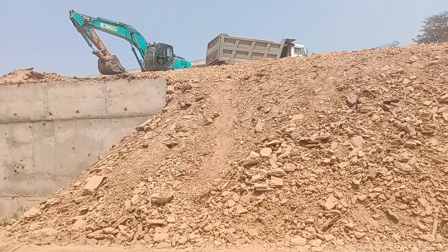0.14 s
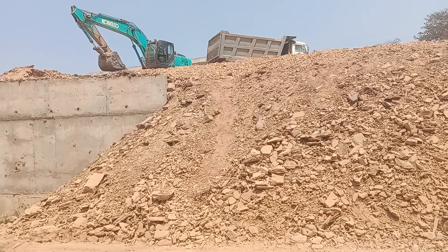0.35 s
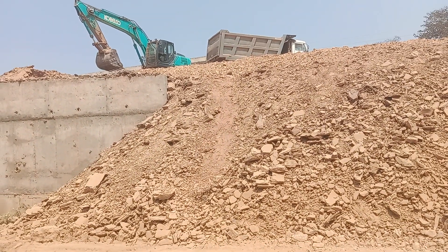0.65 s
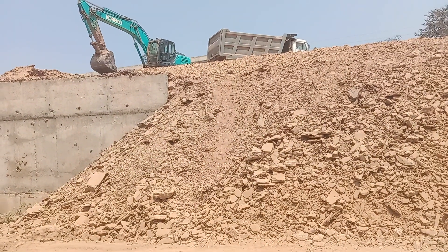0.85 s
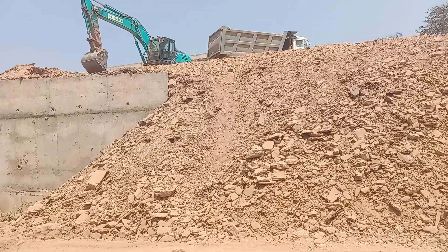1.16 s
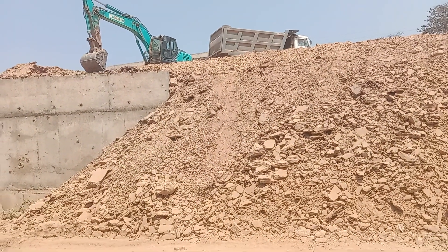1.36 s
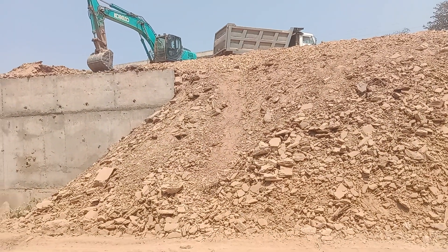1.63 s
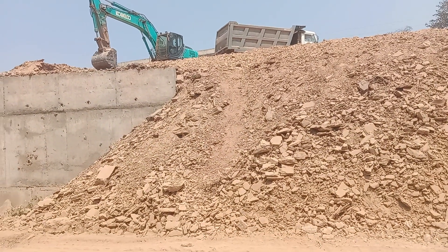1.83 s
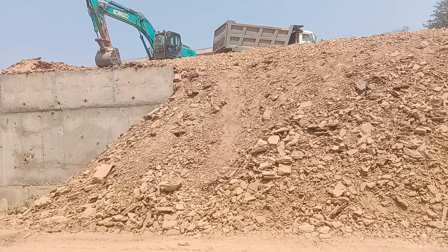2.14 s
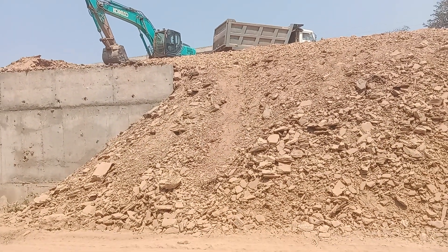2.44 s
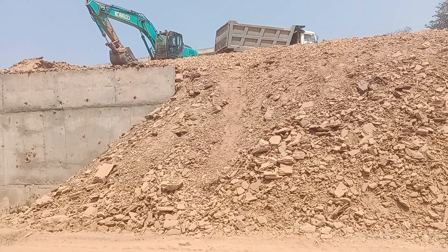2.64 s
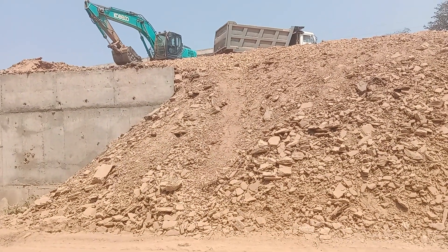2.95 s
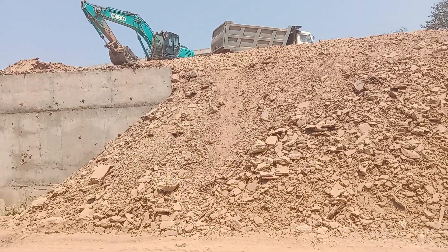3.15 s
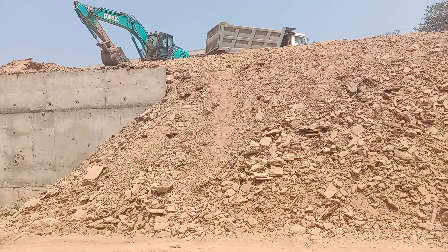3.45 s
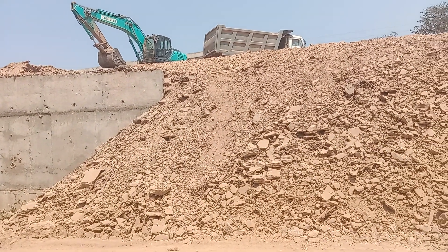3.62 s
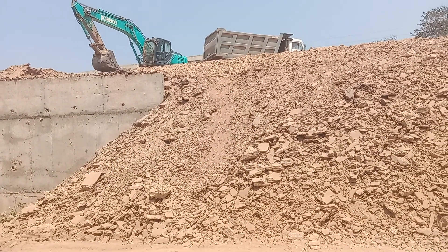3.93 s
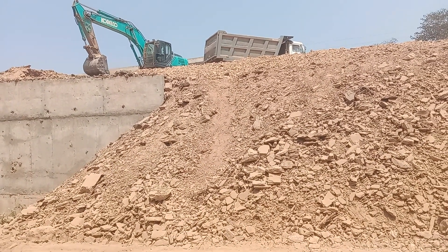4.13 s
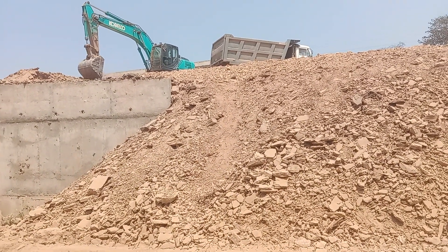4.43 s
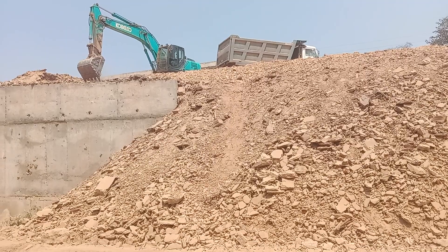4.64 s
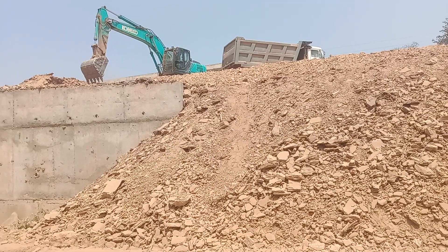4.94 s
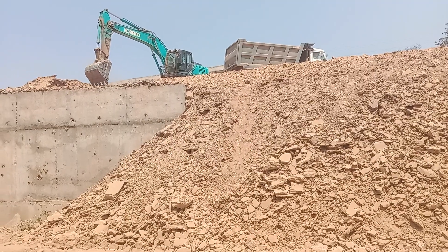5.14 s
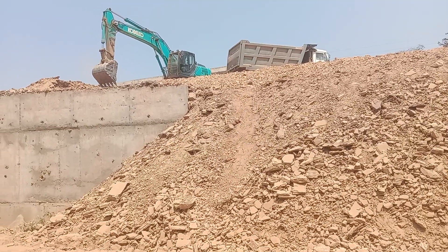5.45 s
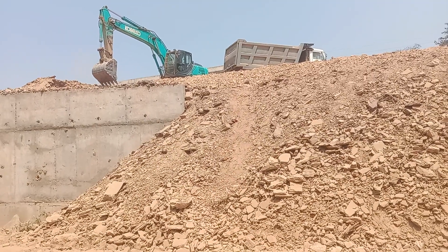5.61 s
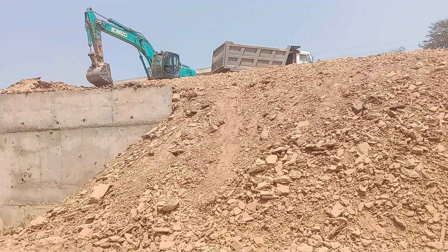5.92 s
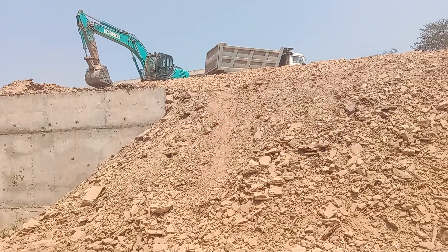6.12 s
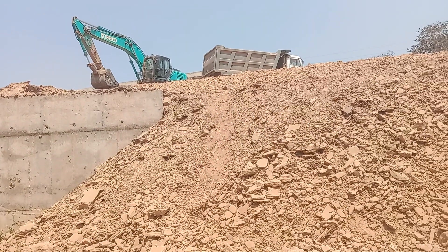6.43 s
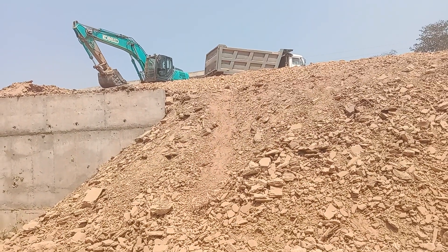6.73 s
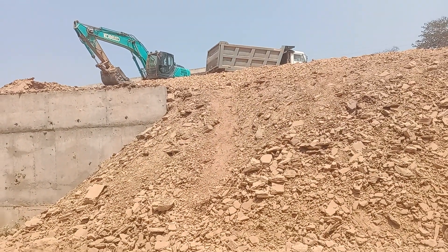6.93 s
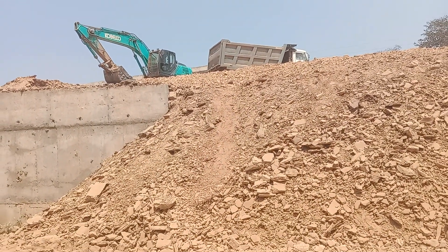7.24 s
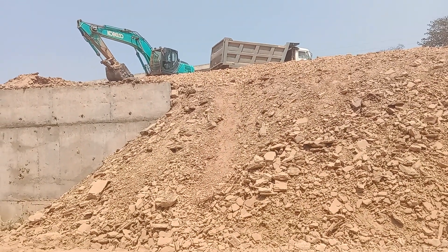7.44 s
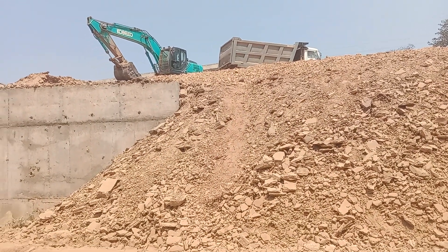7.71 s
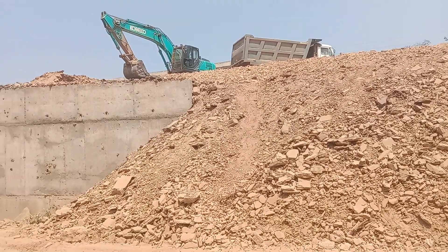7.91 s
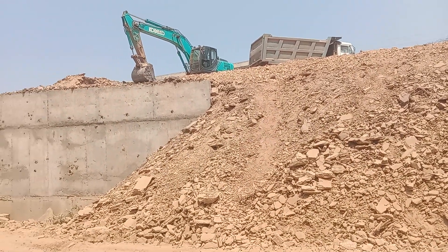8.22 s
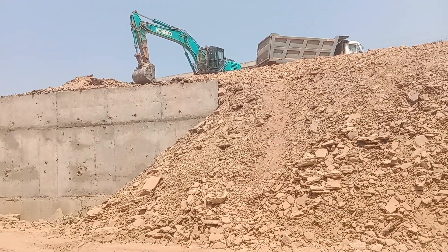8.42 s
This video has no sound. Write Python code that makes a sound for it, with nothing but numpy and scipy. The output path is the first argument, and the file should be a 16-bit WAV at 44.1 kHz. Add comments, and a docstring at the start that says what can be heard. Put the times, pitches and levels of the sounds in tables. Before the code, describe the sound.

Rough stone-on-steel scraping with clanging knocks opens loudly, heard from some distance outdoors through a small phone microphone with little deep bass. Irregular bursts follow, with short dull metallic rings and a faint slap of echo. A quiet pause falls before six seconds, then a few crunches and clanks. Dry, close taps from the hand on the phone stand out late; faint engine noise, thin hiss and a weak rising squeak remain.

```python
"""Stones grind and knock against steel at once: an excavator high on a bank of spoil drags and shakes
its bucket through loose rock. Random stone contacts excite resonant plates, and single plates sing out.
Filtered noise makes the faint engine, its pump whine and fan; a rough whistle and hiss lie on top.
Late on, damped swings with noise snaps give ticks from the hand on the phone, close to the microphone,
and a short rising tone squeaks."""
import sys
import numpy as np
from scipy import signal
from scipy.io import wavfile

SR = 44100
rng = np.random.default_rng(int(sys.argv[2]) if len(sys.argv) > 2 else 0)


def digitize_waveform(pressure):
    """Quantize a signal to 16-bit integers and store it at the path in sys.argv[1].

    Rows of a 2-D input are taken as channels; values are limited to [-1, 1].
    """
    field = np.atleast_2d(pressure).T
    bounded = np.clip(field, -1, 1)
    quanta = np.round(bounded * 32767).astype(np.int16)
    wavfile.write(sys.argv[1], SR, quanta)


N = 377935

# Strokes of the bucket through stone; the last three columns are relative to the grinding level:
# start_s, length_s, start_level_db, end_level_db, heavy_db, sharp_db, grit_db
STROKES = [(-0.05, 0.29, -14.5, -20, 2.5, -1, -0.5), (0.186, 0.7, -19, -25.5, 2.5, 2, -5),
           (0.902, 0.21, -21.5, -21, -21, -13, -33), (1.145, 0.12, -34, -13, -24, 0, -14),
           (1.625, 0.4, -12, -21.5, -2, -1.5, 0), (2.196, 0.082, -37, -38, -25, -10.5, -6),
           (2.409, 0.062, -35, -39.5, 1.5, 8, 2), (2.776, 0.18, -36.5, -28.5, -18, 10, 13),
           (2.821, 0.38, -14.5, -25, -1, -5.5, -18), (3.192, 0.07, -6.5, -9.5, -0.5, -0.5, 1.5),
           (3.333, 0.18, -27, -21, 2.5, 1.5, -2.5), (3.547, 0.13, -45, -24, -12, 0, -9),
           (3.867, 0.16, -4, -20, -1.5, -2.5, -1.5), (4.24, 0.24, -24.5, -16.5, -8, -7.5, -11),
           (4.615, 0.36, -59, -61, -10, 19, 13), (4.864, 0.085, -70, -21.5, -32, -7, -25),
           (4.988, 0.018, -7, -12, -3.5, 2, -1), (5.122, 0.23, -15.5, -18.5, -7.5, -2.5, -10),
           (5.305, 0.18, -20.5, -23.5, -10, -5.5, -7.5), (5.607, 0.81, -54.5, -57.5, 2.5, 2.5, 3.5),
           (6.505, 0.16, -14, -53, -8.5, -2, -2.5), (6.813, 0.03, -31.5, -29, -8, 1.5, -15.5),
           (6.855, 0.29, -7.5, -32, -4, -2.5, -2), (7.014, 0.023, -23.5, -10, -6.5, 0.5, -22),
           (7.502, 0.1, -29, -34.5, -9, 3, -4), (7.671, 0.017, -47, -19.5, -37, -7, -27),
           (7.868, 0.1, -10, -19, -2, -2, -1), (8.09, 0.46, -57.5, -48, -0.5, -5.5, -5.5)]
# Knocks of rock and linkage on steel; heavy, sharp and grit are relative to the level:
# start_s, level_db, heavy_db, sharp_db, grit_db, rattle_t60_s (kept within 0.02 to 0.6 s when played)
KNOCKS = [(0.045, -9.5, -5, -37, -16, 0.19), (0.077, -8, 7.5, 2, -1, 0.18),
          (0.202, -5.5, -29.5, -3, -2.5, 0.51), (0.358, -7.5, 0, -3.5, -37.5, 0.52),
          (0.48, -8, -2.5, -3.5, -0.5, 0.91), (0.578, -11, -3.5, -8, -3, 0.33),
          (0.65, -11, -3, -2.5, -15, 0.35), (0.677, -8, -3, 0, -1, 0.82),
          (0.698, -3.5, -14, -1.5, 8.5, 0.011), (0.815, -13.5, -3.5, -8, -35, 0.64),
          (1.003, -17, -2, -7.5, -16, 0.48), (1.165, -15, -1.5, -4, -15, 0.51),
          (1.275, -22.5, -33, -6, -2, 0.37), (1.315, -26.5, -16.5, -4, 3.5, 0.14),
          (1.609, -28.5, -16, 0, -9, 0.29), (1.634, -22.5, -28, -3, 12, 0.29),
          (1.804, -10, 0.5, -13.5, -14.5, 0.35), (1.844, -5.5, -11, 0.5, -3.5, 0.36),
          (1.964, -7, -37, -3, -2, 0.4), (2.233, -42, -16, -22, -27, 0.16),
          (2.415, -22.5, -32, 9, -13, 0.11), (2.828, -8.5, -15, -0.5, 5.5, 0.39),
          (3.004, -13.5, 3, 0.5, -16, 0.31), (3.161, -3.5, -16, -17.5, -25, 0.046),
          (3.178, -4, -2, 2, 5, 0.21), (3.33, 1, -6, -5.5, -2, 0.35), (3.505, -18, -2, -8, -17, 0.24),
          (3.632, -21.5, -0.5, -29, -22, 0.23), (3.664, -17, -4, 0.5, -1, 0.15),
          (3.865, -10.5, -3, -15, 13, 0.064), (4, -22, 8, -8, -1, 0.18), (4.237, -29.5, 5, -38, -3, 0.64),
          (4.385, -25.5, -9, 4, -4, 0.33), (4.451, -13, -5.5, 2, 2.5, 0.34),
          (4.651, -36.5, -24, 10.5, 4.5, 0.14), (4.753, -36, -37, 5.5, 2, 0.21),
          (4.893, -27.5, -25.5, -4, -4.5, 0.36), (4.971, -14, -9, 2.5, -1, 0.46),
          (5.084, -22.5, -3, 5.5, 4, 0.41), (5.169, -15.5, 1.5, 6, 5.5, 0.35),
          (5.195, -9, -1.5, 2.5, 1.5, 0.22), (5.298, -7.5, -7, -4, -17.5, 0.074),
          (5.333, -7.5, -43, -5.5, -3, 0.057), (5.463, -18, -10, -36, -27, 0.25),
          (5.589, -52, -18, 20.5, 22, 0.35), (6.493, -29, -26, -0.5, -2, 0.24),
          (6.584, -30.5, -41, 9, -36, 0.11), (6.85, -14.5, -20, 9, 4.5, 0.065),
          (6.952, -27, 10.5, 2.5, -5.5, 0.21), (7.035, -8, 1.5, -4, -9, 0.079),
          (7.479, -18.5, -18, -4.5, -17, 0.23), (7.664, -20, -35, -12, -7, 0.057),
          (7.71, -23, -2.5, 1, -24, 0.17), (7.858, -16.5, -22.5, 0, -10.5, 0.22),
          (7.953, -11, -4.5, -1, -2, 0.28)]
# Plates of the bucket: pitch_hz, level_db
PLATES = [(104, -16), (139, -14), (269, -14.5), (387, -7), (559, -27), (751, -4), (861, -10), (1195, -15),
          (1270, -20), (1496, -18), (1658, -27), (1841, -16.5), (2444, -28), (2594, -22.5), (2982, -22.5),
          (3208, -26), (3380, -23.5), (3725, -31), (4059, -31), (4705, -28.5), (5038, -35), (5329, -36),
          (5738, -38.5), (6180, -35.5)]
# Relative spectrum of the crowd of lesser modes in bucket, teeth and arm: pitch_hz, level_db_per_hz
LESSER_MODES = [(70, -20), (130, -24.5), (190, -10.5), (280, 2), (430, -3.5), (530, -36.5), (700, -18),
                (800, -3), (1000, 0.5), (1130, -9), (1500, -5.5), (2000, -26), (2150, -30), (2450, -11),
                (2700, -31), (2950, -14), (3450, -20), (3650, -64), (4200, -29.5), (4600, -30),
                (5500, -29.5), (6200, -39), (7000, -59.5)]
# Engine levels over time: time_s, rumble_db, clatter_db
ENGINE_LEVELS = [(0.0, -37, -37.5), (0.5, -46, -28.5), (1.41, -56, -76.5), (1.81, -65, -32.5),
                 (2.46, -56, -59.5), (3.01, -63, -44), (3.41, -49.5, -17.5), (3.67, -52.5, -48),
                 (5.2, -54.5, -49.5), (5.7, -60, -58.5), (6.4, -63, -61), (7.09, -53, -48),
                 (7.37, -58, -54.5), (7.83, -51, -43.5), (8.16, -58, -51), (8.57, -58.5, -61.5)]
# Relative spectrum of the engine clatter: pitch_hz, level_db_per_hz
CLATTER_SPECTRUM = [(150, -15), (331, 16), (520, -17.5), (766, 2), (900, 3), (960, 5), (1040, -12.5),
                    (1450, 3.5), (1690, -12), (1890, 2), (2190, -23), (3100, -8.5), (4900, -40)]
# Swells of a thin high whistle that glides from one to the next:
# middle_s, pitch_hz, peak_db, fade_db_per_s (on either side of the middle)
SWELLS = [(3.781, 12000, -73, 40), (4.299, 12100, -76, 24.5), (5.461, 12000, -65, 116),
          (6.0, 12550, -81.5, 14)]
# Short single-plate tones that sag while held, then die quickly: start_s, pitch_hz, level_db, held_s
RINGS = [(0.085, 766, -16.5, 0.045), (0.25, 760, -14.5, 0.026), (0.357, 259, -7.5, 0.012),
         (0.815, 263, -18, 0.018), (1.161, 264.6, -13.5, 0.039), (2.1, 755, -28.5, 0.067),
         (2.225, 949, -34, 0.077), (2.233, 1854, -48, 0.052), (2.45, 739, -33.5, 0.038),
         (3.185, 735, -18.5, 0.089), (3.334, 390, -37, 0.046), (3.4, 740, -20, 0.066),
         (3.4, 840, -20.5, 0.034), (3.503, 397, -23.5, 0.068), (3.624, 278, -22, 0.048),
         (4.11, 1064, -44, 0.091), (4.248, 273.2, -23, 0.079), (4.65, 1800, -42, 0.032),
         (4.665, 1496, -45, 0.16), (4.76, 900, -44, 0.065), (4.865, 1995, -41.5, 0.03),
         (4.452, 274, -11, 0.025), (4.902, 274, -30, 0.049), (5.298, 260.6, -8.5, 0.018),
         (5.333, 1420, -10.5, 0.011), (5.468, 732, -25.5, 0.05), (5.475, 1840, -48.5, 0.31),
         (5.614, 1910, -40, 0.024), (5.91, 1980, -50, 0.03), (5.93, 1820, -59, 0.041),
         (6.52, 796, -27, 0.032), (6.582, 2990, -50, 0.22), (6.87, 782, -20, 0.041), (7.5, 955, -28.5, 0.1),
         (8.37, 1407, -54.5, 0.087), (8.41, 747, -43, 0.06), (8.5, 906, -54, 0.06)]
# Ticks by the microphone:
# start_s, level_db, body_hz, damping_per_cycle (nepers), snap_db, snap_length_s
TICKS = [(7.303, -18.5, 1810, 0.61, -36.5, 0.0029), (7.5871, 7.5, 1190, 3.1, -38, 0.001),
         (7.5879, -5, 326, 1.6, -17.5, 0.0033), (7.6217, 17.5, 850, 3.5, -26, 0.0011)]
# Borders between the heavy, middle, sharp and gritty ranges: border_hz
RANGE_BORDERS_HZ = [560, 2150, 3650]

BITE_DB_PER_S = 1501   # how fast a stroke sets in
FALL_DB_PER_S, FALL_QUICKENS_S = 106.5, 0.047   # how a stroke dies away: the rate doubles after this time
CRUNCH_DB, CRUNCH_RATE_HZ = 2.8, 35   # the grinding level wanders in lumps
LONGEST_RING_S, MOST_CYCLES = 0.1, 200   # limits on plate t60: high modes die sooner
WANDER_DB_PER_KHZ = 0.7   # the level of high modes wanders more
GRIT_DB = -36   # rasp of the stones themselves, heard beside the steel
FIRING_HZ = 73
WHINE_HZ, WHINE_FADES_DB_PER_S = 5038, 1.2   # hydraulic pump
FAN_DB = -74.5   # hiss of the cooling fan
AIR_DB = -92
RING_RISE_S, RING_SAG_DB_PER_S = 0.0085, 55
RING_END_DB_PER_S = 703.5   # extra fall once no longer held
RING_WAVER_DB, RING_WAVER_PITCH = 4.5, 0.014   # unsteady level; share of the pitch
SQUEAK_S, SQUEAK_LENGTH_S, SQUEAK_DB = 8.25, 0.095, -51.5
SQUEAK_FROM_HZ, SQUEAK_TO_HZ = 545, 625
CUTOFF_HZ = 16100


def from_db(db):
    """Decibels to amplitude."""
    return 10 ** (np.asarray(db) / 20)


def rms_one(x):
    """Bring a signal to an rms of 1."""
    return x / np.sqrt(np.mean(x ** 2) + 1e-20)


def in_time(rows):
    """Draw each column of a table as a straight-line curve over time, the first column."""
    s, *columns = np.transpose(rows)
    return [np.interp(np.arange(N) / SR, s, c) for c in columns]


def band(x, low_hz, high_hz):
    """Keep the band between two pitches."""
    return signal.sosfilt(signal.butter(2, [low_hz, high_hz], "band", fs=SR, output="sos"), x)


def lowpass(x, order, hz):
    """Cut the treble above a pitch."""
    return signal.sosfilt(signal.butter(order, hz, fs=SR, output="sos"), x)


def ring(x, hz, t60):
    """One mode with steep skirts: a narrow resonance, scaled for its decay, and a broad one in series."""
    turn = 2 * np.pi * hz / SR
    r = from_db(-60 / (t60 * SR))
    wide = np.exp(-np.pi * (50 + 0.055 * hz) / SR)
    narrow_gain = np.sqrt(1 - r) / 2
    wide_gain = (1 - wide ** 2) / 2
    narrow_stage = [narrow_gain, 0, -narrow_gain, 1, -2 * r * np.cos(turn), r * r]
    wide_stage = [wide_gain, 0, -wide_gain, 1, -2 * wide * np.cos(turn), wide ** 2]
    return signal.sosfilt([narrow_stage, wide_stage], x)


def patches(spread_db, rate_hz):
    """A randomly wandering gain, rms 1: noise at every 40th sample through a double one-pole low-pass."""
    r = np.exp(-80 * np.pi * rate_hz / SR)
    noise = rng.standard_normal(N // 40 + 2002)
    slow = signal.lfilter([1], [1, -2 * r, r * r], noise)[2000:]   # skip the filter's start
    gain = from_db(spread_db * rms_one(slow))
    return np.interp(np.arange(N) / 40, np.arange(len(slow)), rms_one(gain))


def crowd(spectrum, cycles, longest, count):
    """Many modes (pitch_hz, level_db, t60_s), unevenly spaced, closer in the bass, levelled by a spectrum."""
    hz, db = np.transpose(spectrum)
    places = (np.arange(count) + rng.uniform(0.012, 1.0, count)) / count
    pitch = hz[0] + (hz[-1] - hz[0]) * places ** 1.5
    level = np.interp(np.log(pitch), np.log(hz), db)
    level += 5 * np.log10(places)   # wider gaps, more power each
    level -= 10 * np.log10(np.sum(from_db(level) ** 2))   # total power 1
    return np.transpose([pitch, level, np.minimum(cycles / pitch, longest)])


def grains(per_s, spread_db):
    """Random stone contacts of uneven size and either sign; rms 1."""
    sizes = from_db(spread_db * np.minimum(rng.exponential(1, N), 5)) * rng.choice([-1, 1], N)
    return rms_one(sizes * (rng.random(N) < per_s / SR))


def four_ranges(level_db, heavy_db, sharp_db, grit_db):
    """Power in the heavy, middle, sharp and gritty range."""
    return from_db(level_db + np.array([[heavy_db], [0], [sharp_db], [grit_db]])) ** 2


def contact():
    """Force on the steel in four ranges: strokes through the stone plus knocks that die away."""
    power, now = np.zeros((4, N)), np.arange(N) / SR
    for s, length, start_db, end_db, *colour_db in STROKES:
        span = slice(max(round((s - 0.1) * SR), 0), round((s + length + 0.5) * SR))
        t = now[span] - s
        after = np.maximum(t - length, 0)
        level_db = np.interp(t, [0, length], [start_db, end_db])
        level_db += BITE_DB_PER_S * np.minimum(t, 0)
        level_db -= FALL_DB_PER_S * after * (1 + after / (2 * FALL_QUICKENS_S))
        power[:, span] += four_ranges(level_db, *colour_db)
    power *= patches(CRUNCH_DB, CRUNCH_RATE_HZ) ** 2
    for s, level_db, *colour_db, t60 in KNOCKS:
        at = round(s * SR)
        t = now[:min(SR // 2, N - at)]
        fade = from_db(-60 * t / np.clip(t60, 0.02, 0.6)) * (1 - np.exp(-t / 0.0008))
        fade *= 1 + 2.2 * np.exp(-t / 0.004)   # the first impact is hardest
        power[:, at:at + len(t)] += four_ranges(level_db, *colour_db) * fade ** 2
    return np.sqrt(power)


def bucket():
    """Stone contacts drive each mode at its own wandering level; the tables set each event's treble."""
    pushes = contact()[:, None] * [grains(3000, 3.2), grains(3000, 3.2)]
    plates = [(hz, db, min(LONGEST_RING_S, MOST_CYCLES / hz)) for hz, db in PLATES]
    lesser = crowd(LESSER_MODES, cycles=170, longest=0.042, count=130) + [0, 4, 0]   # 4 dB up
    ranges = np.zeros((4, N))
    for modes, wander_db, rate_hz in [(plates, 1.5, 14), (lesser, 3.5, 22)]:
        for k, (hz, level_db, t60) in enumerate(modes):
            which = np.searchsorted(RANGE_BORDERS_HZ, hz)
            wander = patches(wander_db + WANDER_DB_PER_KHZ * hz / 1e3, rate_hz)
            ranges[which] += from_db(level_db) * ring(pushes[which, k % 2] * wander, hz, t60)
    ranges[3] += from_db(GRIT_DB) * band(band(pushes[3, 1], 4000, 6300), 4000, 6300)
    steel = sum(lowpass(x, 6, hz) for x, hz in zip(ranges, [1500, 2600, 4000, 7300]))
    # the faint top edge of sharp contacts
    crack = from_db(-58) * band(band(pushes[3, 0], 11300, 15500), 11300, 15500)
    return lowpass(steel, 8, 7100) + crack


def engine():
    """An unsteady firing note with rumble, a far clatter in patches, the pump's whine and the fan."""
    rumble_db, clatter_db = in_time(ENGINE_LEVELS)
    white = rng.standard_normal((3, N))
    firing = rms_one(ring(white[2], FIRING_HZ, 0.44))
    rumble = firing + from_db(7.5) * rms_one(band(white[2], 55, 110))
    rumble *= patches(4.5, 6)
    clatter = np.zeros(N)
    for k, (hz, db, t60) in enumerate(crowd(CLATTER_SPECTRUM, cycles=90, longest=0.06, count=70)):
        clatter += from_db(db) * ring(white[k % 2] * patches(6.9, 13), hz, t60)
    # the whine rises a little with the clatter and grows fainter with time
    whine_db = 0.12 * clatter_db - 63 - WHINE_FADES_DB_PER_S * np.arange(N) / SR
    whine = from_db(whine_db) * patches(2, 4) * rms_one(ring(white[0], WHINE_HZ, 0.3))
    fan = from_db(FAN_DB) * patches(2.5, 5) * rms_one(band(band(white[1], 1200, 6000), 900, 6200))
    return from_db(rumble_db) * rumble + from_db(clatter_db) * rms_one(clatter) + whine + fan


def treble():
    """Faint hiss at the top, and a gliding sine made rough by low noise that swells and fades."""
    now = np.arange(N) / SR
    level = sum(from_db(peak_db - fade_db * np.abs(now - s)) for s, _, peak_db, fade_db in SWELLS)
    white = rng.standard_normal((2, N))
    rough = rms_one(band(white[0], 15, 140)) * patches(4, 12)
    hz = in_time(SWELLS)[0]
    whistle = level * rough * np.sin(2 * np.pi * np.cumsum(hz) / SR)
    wide_hiss = rms_one(band(white[1], 8500, 17000))
    high_hiss = rms_one(band(band(white[0], 11400, 15600), 11400, 15600))
    return whistle + from_db(AIR_DB) * (wide_hiss + 1.6 * high_hiss)


def rings():
    """Each ring rises fast, sags while it is held and then dies quickly; level and pitch waver a little."""
    out, waver = np.zeros(N), patches(RING_WAVER_DB, 60)
    bend = np.log10(patches(20, 30))
    bend -= bend.mean()
    for s, hz, level_db, held in RINGS:
        span = slice(round(s * SR), min(round((s + held + 0.15) * SR), N))
        t = np.arange(span.stop - span.start) / SR
        loss_db = RING_SAG_DB_PER_S * t + RING_END_DB_PER_S * np.maximum(t - held, 0)
        rise = 1 - np.exp(-t / RING_RISE_S)
        tone = np.sin(2 * np.pi * hz * np.cumsum(1 + RING_WAVER_PITCH * bend[span]) / SR)
        out[span] += from_db(level_db - loss_db) * np.sqrt(2) * rise * tone * waver[span]
    return out


def ticks():
    """A damped swing of the case with a bright snap of noise on it."""
    out, white = np.zeros(N), rng.standard_normal(N)
    port = rms_one(band(band(white, 4900, 6500), 4900, 6500))   # the microphone port rings here
    body = rms_one(band(white, 900, 4350))
    edge = rms_one(band(band(white, 12000, 17000), 11700, 14400))
    snap = port + from_db(-2.5) * body + from_db(-19) * edge
    for s, level_db, hz, damping, snap_db, length in TICKS:
        t = np.maximum(np.arange(N) / SR - s, 0)
        swing = -np.sin(2 * np.pi * hz * t) * np.exp(-t * hz * damping) * (1 - np.exp(-t * hz * 4.3))
        burst = np.sin(np.pi * np.minimum(t / length, 1)) ** 2
        out += from_db(level_db) * swing + from_db(snap_db) * snap * burst
    return out


def squeak():
    """A swelling note with its octave growing in; the pitch climbs and levels off."""
    share = np.clip((np.arange(N) / SR - SQUEAK_S) / SQUEAK_LENGTH_S, 0, 1)
    hz = SQUEAK_FROM_HZ + (SQUEAK_TO_HZ - SQUEAK_FROM_HZ) * np.sin(np.pi * share / 2)
    turn = 2 * np.pi * np.cumsum(hz) / SR
    swell = np.sqrt(2) * np.sin(np.pi * share ** 2)
    return from_db(SQUEAK_DB) * swell * (np.sin(turn) + share * np.sin(2 * turn))


def scene():
    """The machine with one late echo, plus the ticks, hiss and whistle, which have none."""
    far = bucket() + engine() + rings() + squeak()
    echo = np.zeros(N)
    lag = round(0.054 * SR)   # off the concrete wall and the slope
    echo[lag:] = from_db(-15) * far[:-lag]
    return (far + echo + treble() + ticks())[None]


def record(dry):
    """The small microphone drops the deep bass; peaks are rounded, the top is cut."""
    thin = signal.sosfilt(signal.butter(2, 60, "high", fs=SR, output="sos"), dry)
    rounded = 0.79 * np.tanh(thin / 1.384)
    return signal.sosfilt(signal.cheby2(12, 70, CUTOFF_HZ, fs=SR, output="sos"), rounded)


dry = scene()
out = record(dry)
digitize_waveform(out)
```